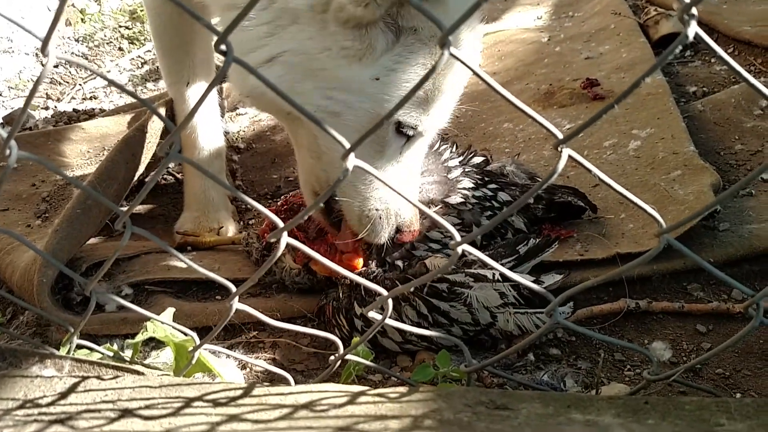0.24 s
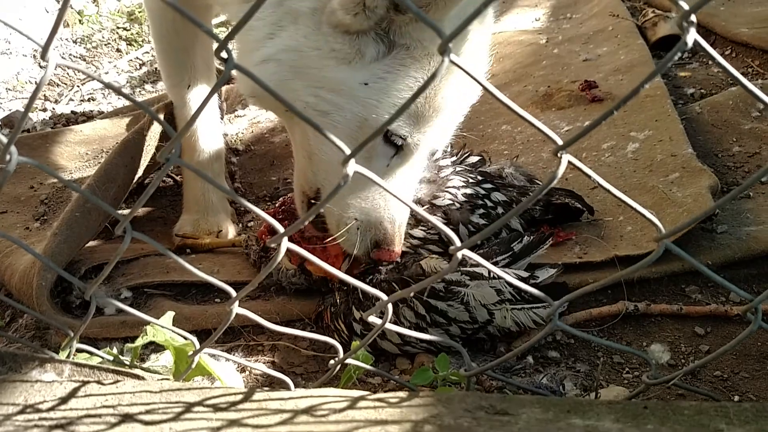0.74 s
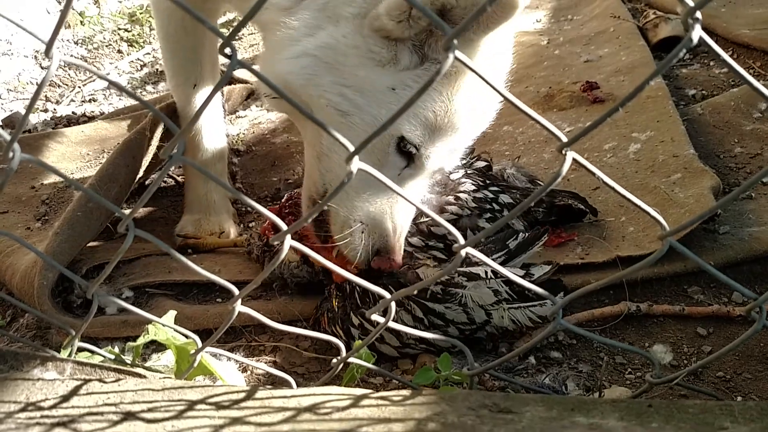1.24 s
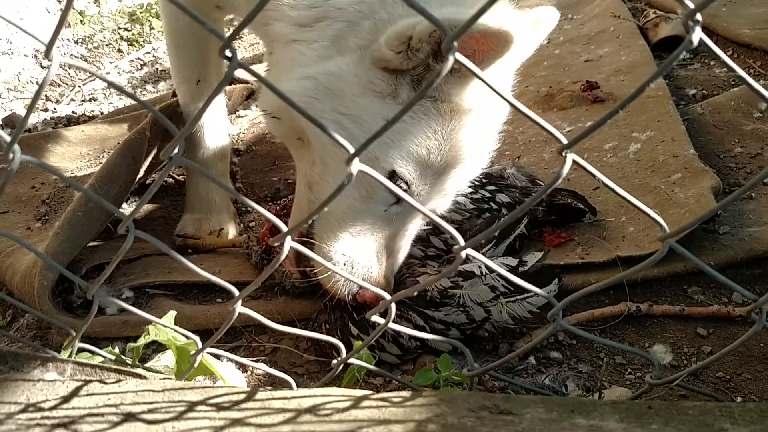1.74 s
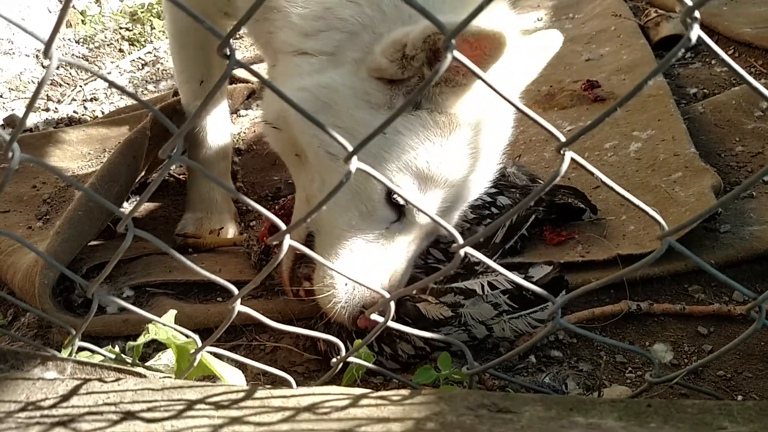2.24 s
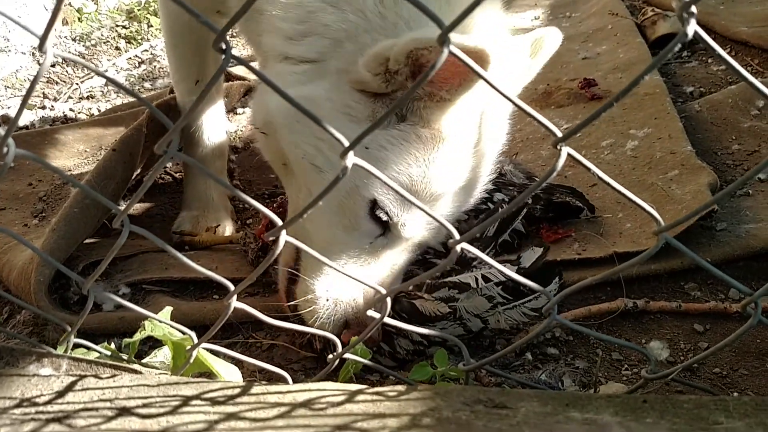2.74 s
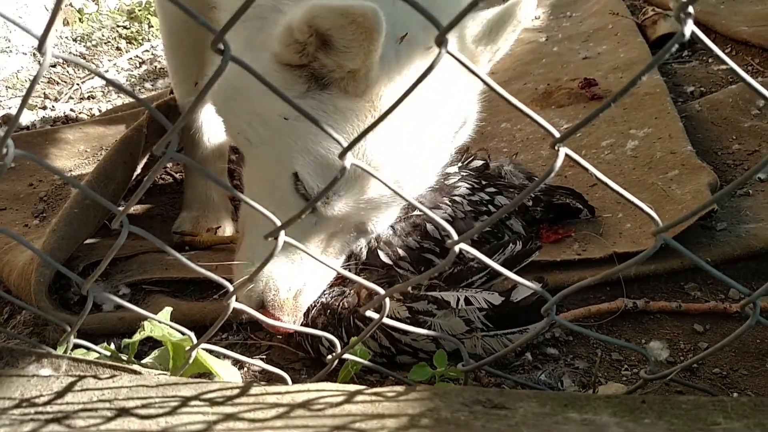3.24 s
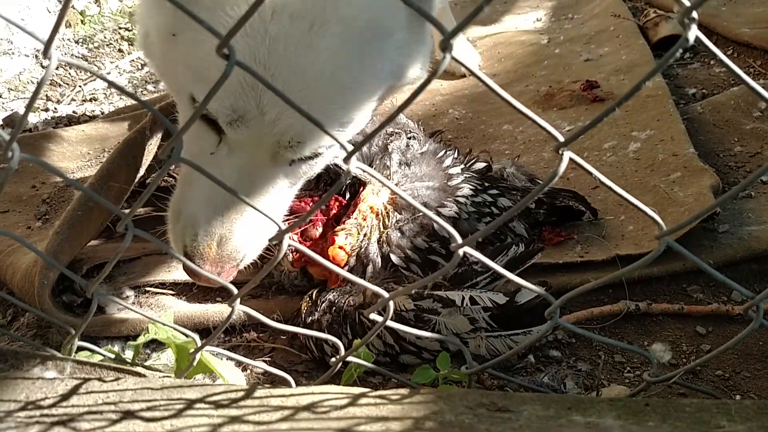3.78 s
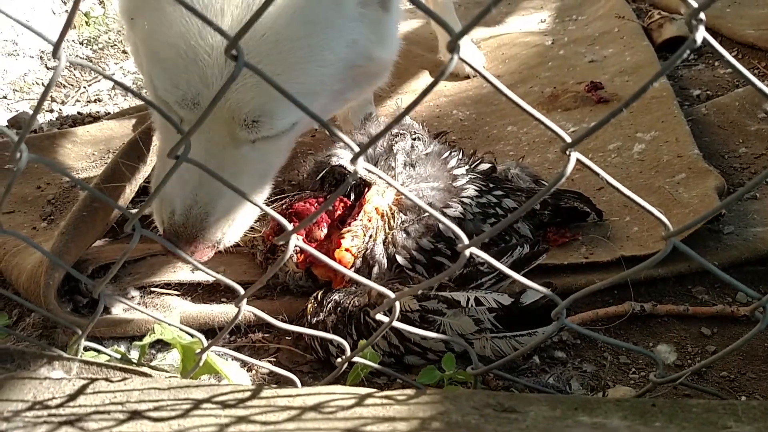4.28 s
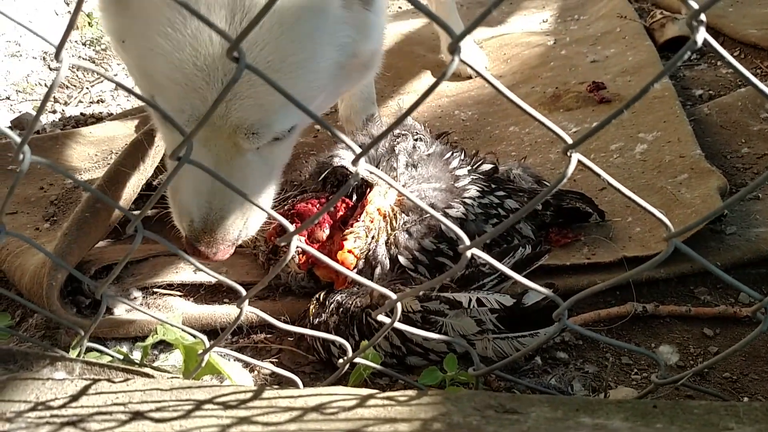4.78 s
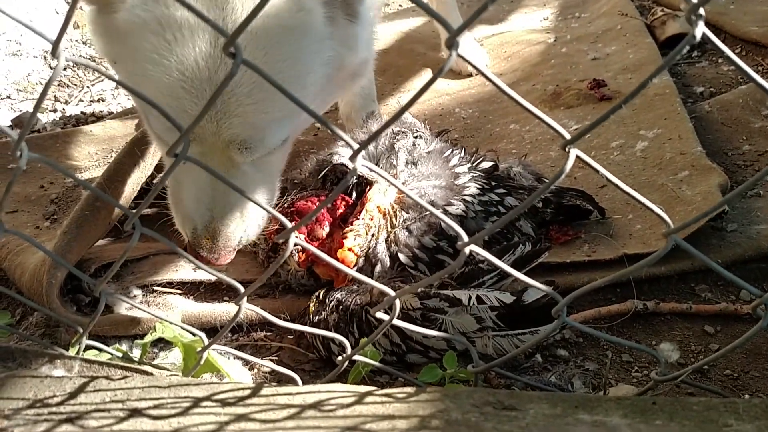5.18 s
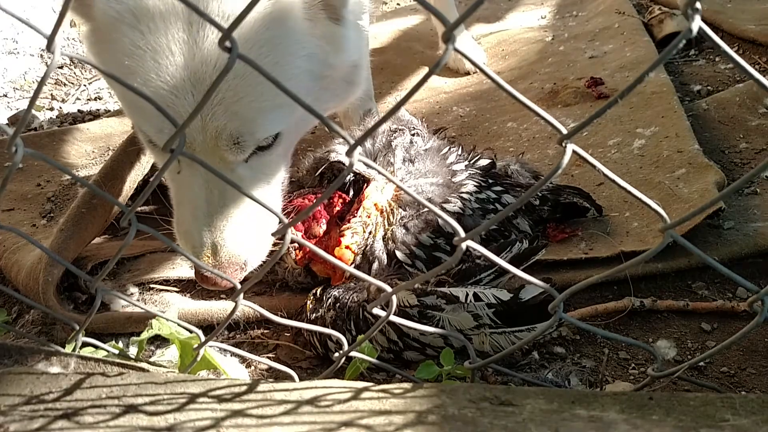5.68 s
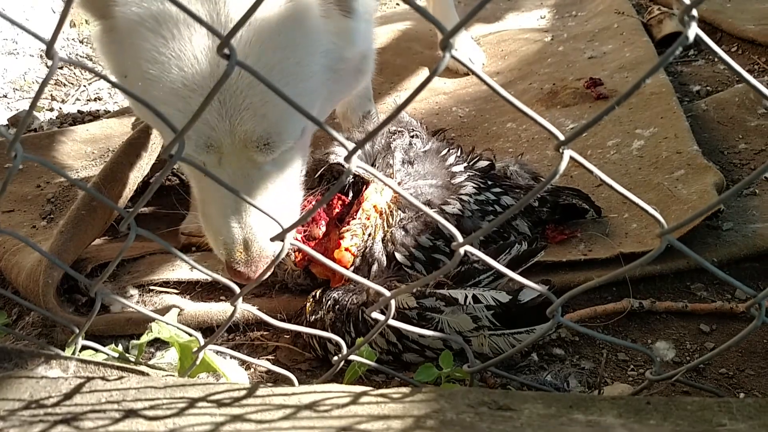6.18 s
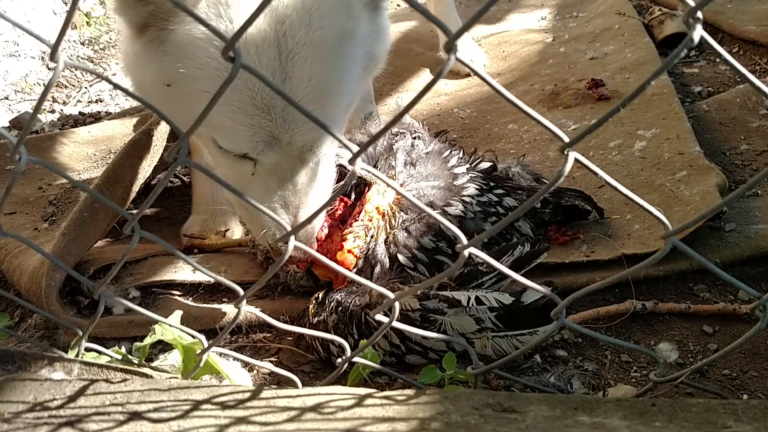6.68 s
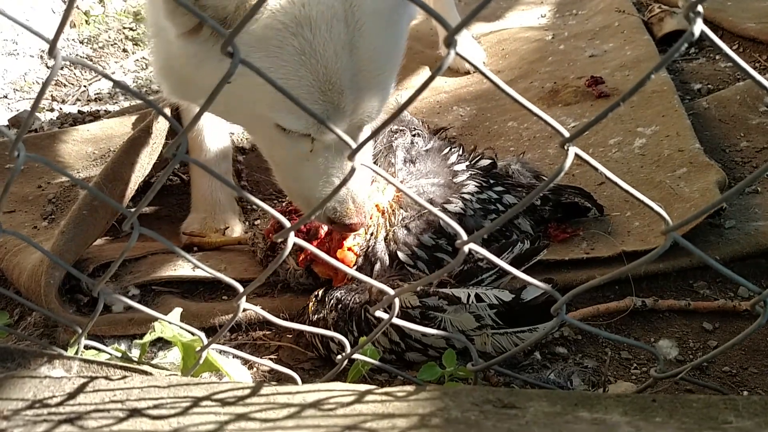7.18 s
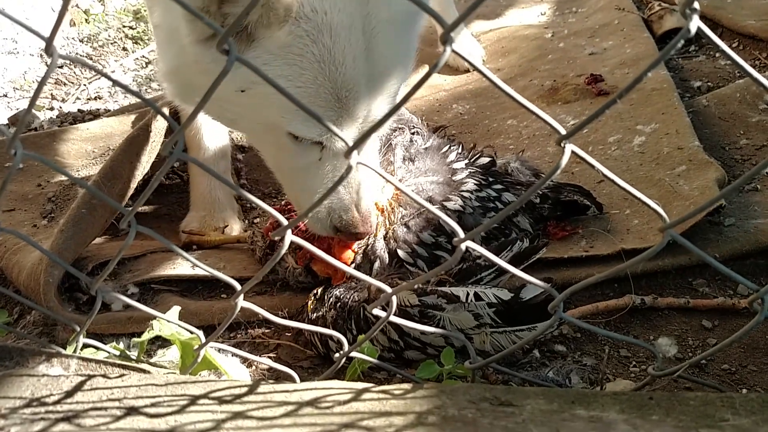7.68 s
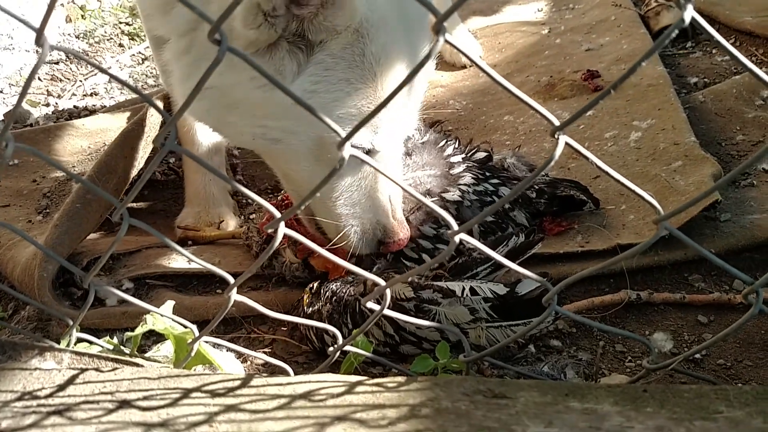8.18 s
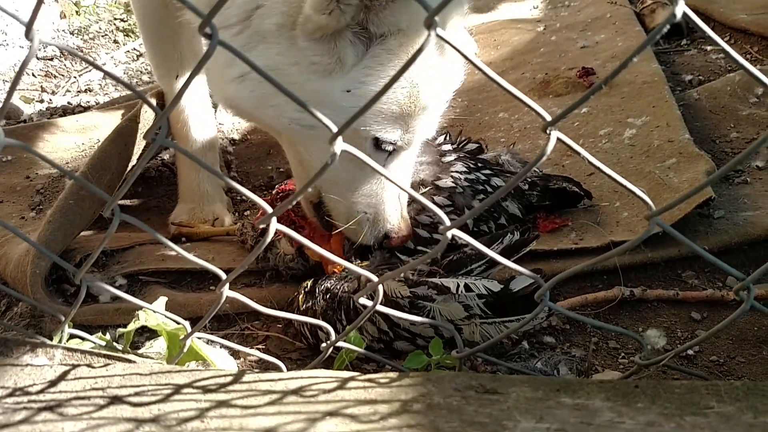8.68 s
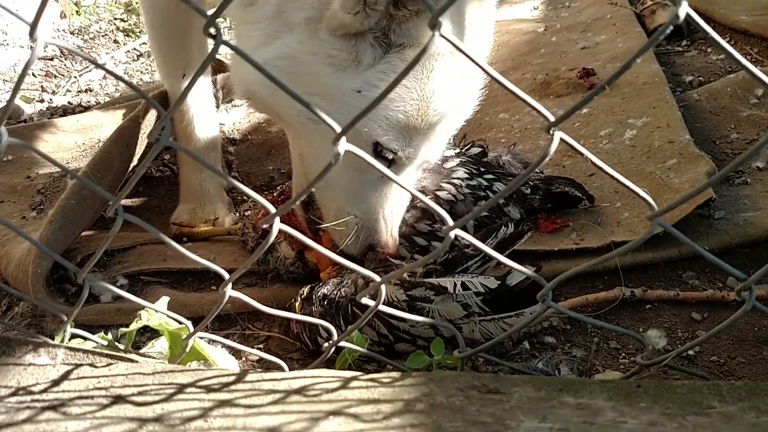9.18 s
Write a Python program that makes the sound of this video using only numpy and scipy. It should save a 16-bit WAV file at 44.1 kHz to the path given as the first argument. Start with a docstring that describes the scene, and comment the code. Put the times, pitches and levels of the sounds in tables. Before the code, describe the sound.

A dog feeds close to the microphone in an open yard. Dry, brittle bone cracks come in irregular bursts, the sharpest around four seconds, with small wet clicks and brief tooth squeaks between. Behind it a cooling unit drones low and steadily, its fan tones slowly beating with a mains hum and airy roar. Soft hiss, a faint rapid treble tick and a few thin bird whistles fill the background.

```python
"""Dog cracking bones beside a cooling unit

A dog cracks bones between its teeth in a yard, close by: ringing modes with dry noise snaps, and tooth squeaks.
An outdoor cooling unit drones behind: beating sine blade tones of two fans, a mains hum and roaring air.
Coloured noise makes hiss and rustle, shaken sines thin whistles, and short sine blips a fast treble tick."""
import sys
import numpy as np
from scipy import signal
from scipy.fft import rfft, irfft
from scipy.io import wavfile
from scipy.ndimage import uniform_filter1d

SR = 44100
rng = np.random.default_rng(int(sys.argv[2]) if len(sys.argv) > 2 else 0)


def transcribe(u):
    """Save the signal u as a 16-bit wav file named by the first command-line argument.

    u: samples, shape (n,) or (channels, n), limited to [-1, 1]; the rate is SR.
    q: integer samples, one column per channel.
    """
    v = np.clip(np.atleast_2d(u).T, -1, 1)
    q = np.round(v * 32767).astype(np.int16)
    wavfile.write(sys.argv[1], SR, q)


def attenuation_scalar(level_db):
    """Turn a level in dB into a linear amplitude multiplier (20 dB per decade)."""
    decades = np.asarray(level_db, float) / 20
    return 10 ** decades


N = 415863
T = np.arange(N) / SR


def walk(rate):
    """Random levels held 1 / rate s and slewed twice; spread near 1."""
    hold = int(SR / rate)
    steps = np.repeat(rng.standard_normal(N // hold + 1), hold)
    return 1.68 * uniform_filter1d(uniform_filter1d(steps, hold), hold)[:N]


def air(spectrum, flicker_db, rate):
    """Noise of a given colour, rms 1; each octave flickers on its own."""
    hz = np.maximum(np.fft.rfftfreq(N, 1 / SR), 1)
    point_hz, point_db = np.transpose(np.array(spectrum, float))
    colour_db = np.interp(np.log(hz), np.log(point_hz), point_db, right=-90)
    coloured = rfft(rng.standard_normal(N)) * attenuation_scalar(colour_db)
    octave = np.log2(hz / 31.25)
    out = np.zeros(N)
    for k in range(10):
        share = np.clip(1 - abs(octave - k), 0, 1)  # neighbouring octaves crossfade
        out += attenuation_scalar(flicker_db * walk(rate)) * irfft(coloured * share, N)
    return out / np.std(out)


def add(out, s, sound):
    """Mix a short sound in at s seconds."""
    i = max(int(s * SR), 0)
    out[i:i + len(sound)] += sound[:N - i]


def fan_blades():
    """Blade tones of two fans at nearly the same speed: they beat, and waver in the turbulent air."""
    first_blades_hz, second_blades_hz = 86.226, 86.368
    # blade orders of the first fan: order, level/dB rms
    first_fan = [(1, -59), (2, -36), (3, -48), (4, -54.5), (5, -45), (6, -54.5), (8, -72), (10, -67),
                 (13, -72), (18, -70.5)]
    # blade orders of the second fan: order, level/dB rms, t/s when in step with the first
    second_fan = [(1, -62, 4.53), (2, -46, 3.55), (3, -54, 2.3), (4, -46, 1.52), (5, -53.5, .89),
                  (6, -70, .06), (8, -75, .72)]
    second = {order: (db, s) for order, db, s in second_fan}
    out = np.zeros(N)
    for order, first_db in first_fan:
        second_db, in_step_s = second.get(order, (-np.inf, 0))
        # both fans share the waver, which grows with the order
        phase = 2 * np.pi * rng.random() + (.08 + .04 * order) * walk(6)
        waver_db = (.7 + .08 * order) * walk(9)
        for hz, db in (first_blades_hz, first_db), (second_blades_hz, second_db):
            out += attenuation_scalar(db + waver_db) * np.sin(2 * np.pi * order * hz * (T - in_step_s) + phase)
    return np.sqrt(2) * out


def mains_hum():
    """A single 120 Hz tone from the mains, slightly unsteady in level."""
    level_db = -39 + .36 * walk(1.75)  # rms
    return np.sqrt(2) * attenuation_scalar(level_db) * np.sin(2 * np.pi * 120 * T)


def housing_roar():
    """Air roars in the housing: low noise with resonant peaks."""
    # relative spectrum: f/Hz, density/dB per Hz
    roar_colour = [(15, -11), (35, -28), (60, -20.5), (100, -9.5), (130, -10.5), (158, 2.5), (200, -14.5),
                   (238, -0.5), (250, -4.5), (270, -2), (330, -6), (378, -9.5), (408, -14), (436, -13),
                   (452, -2.5), (475, -14.5), (540, -17.5), (750, -30.5)]
    return attenuation_scalar(-38) * air(roar_colour, flicker_db=.8, rate=6)


def hiss():
    """Steady broad hiss of the yard, as softly flickering noise."""
    # relative spectrum: f/Hz, density/dB per Hz
    hiss_colour = [(410, -14), (700, -4.5), (907, -1), (1270, -2), (1700, -5.5), (2600, -15), (3400, -8.5),
                   (4300, -18), (8650, -21.5), (10200, -24.5), (11500, -30), (13400, -34.5), (15500, -29.5)]
    return attenuation_scalar(-55) * air(hiss_colour, flicker_db=.17, rate=19)


def rustle():
    """Brighter noise that grows over the hiss and flutters."""
    # relative spectrum: f/Hz, density/dB per Hz
    rustle_colour = [(800, -5), (1400, 0), (2300, -5.5), (2700, -5.5), (3400, -1.5), (4400, -12),
                     (8500, -14), (11000, -23.5), (13000, -39)]
    # swell of the rustle: t/s, level/dB rms
    rustle_swell = [(0, -72), (2, -59.5), (5.5, -54.5), (8, -55.5), (9.43, -57.5)]
    swell_db = np.interp(T, *np.transpose(rustle_swell))
    return attenuation_scalar(swell_db + .59 * walk(8)) * air(rustle_colour, flicker_db=.41, rate=11)


def tick():
    """A 4.5 ms blip of sines thirty times a second, a little uneven in time, size and pitch."""
    start_s, period_s = .0093, .0333
    # partials of the blip: f/Hz, peak level/dB
    tick_partials = [(10350, -61), (8650, -66), (11600, -73)]
    out = np.zeros(N)
    t = np.arange(int(.0045 * SR)) / SR
    for k, (late, size, tone) in enumerate(rng.standard_normal((int(N / SR / period_s), 3))):
        blip = np.zeros(len(t))
        for hz, db in tick_partials:
            blip += attenuation_scalar(db + 1.2 * size) * np.sin(2 * np.pi * hz * (1 + .012 * tone) * t)
        add(out, start_s + k * period_s + .0026 * late, blip * np.hanning(len(t)))
    return out


def crack(centre_hz, focus_db, snap_db, ring_time):
    """One break: it rings the modes near its centre most; a dry snap carries the treble."""
    # what bone and mouth ring with: f/Hz, level/dB, t60/s before the factor ring_time
    bone_modes = [(675, 11.5, 0.01), (880, 12.5, 0.013), (1150, -0.5, 0.029), (1376, 9, 0.011),
                  (2300, 5.5, 0.01), (2840, 1.5, 0.01), (3240, -2, 0.014), (5320, -3.5, 0.0071)]
    t = np.arange(int(.04 * SR)) / SR
    hz, db, t60 = np.transpose(bone_modes)[:, :, None]
    detuned_hz = hz * (1 + .015 * rng.standard_normal(hz.shape))
    reach_db = -focus_db * np.log2(hz / centre_hz) ** 2
    decay_db = -60 * t / (t60 * ring_time)
    rings = attenuation_scalar(db + reach_db + decay_db) * np.sin(2 * np.pi * detuned_hz * t)
    ring = rings.sum(axis=0) * (1 - np.exp(-(t / .00065) ** 2))  # soft onset
    snap_band = signal.butter(4, (3000, 9000), "bandpass", fs=SR, output="sos")
    burst = rng.standard_normal(len(t)) * np.exp(-t / .0017)
    snap = signal.sosfilt(snap_band, burst)
    return ring / abs(ring).max() + attenuation_scalar(snap_db) * snap / abs(snap).max()


def wet_clicks():
    """A sparse scatter of 70 small wet clicks: faint breaks of random size and tone."""
    out = np.zeros(N)
    for place, size, tone in rng.random((70, 3)):
        click = crack(800 * 4 ** tone, focus_db=5.3, snap_db=-12, ring_time=.97)
        add(out, place * N / SR, attenuation_scalar(-53.5 + 9.8 * size) * click)
    return out


def whistle(length, start_hz, end_hz, width_hz):
    """Narrow breathy tone, steady or gliding down: a sine shaken in size and phase by noise."""
    n = int(length * SR)
    rough = uniform_filter1d(rng.standard_normal((2, n)), int(SR / width_hz))
    size, shake = rough / np.std(rough)
    phase = 2 * np.pi * np.cumsum(np.linspace(start_hz, end_hz, n)) / SR
    tone = (1 + .4 * size) * np.sin(phase + .6 * shake)
    return tone * np.linspace(1.2, .75, n) * signal.windows.tukey(n, .3)


def bird_phrases():
    """One bird's high three-note phrase, sung as overlapping breathy whistles."""
    # notes of the phrase: t after its start/s, length/s, start f/Hz, end f/Hz, level/dB
    phrase_notes = [(0, .14, 7180, 7180, -68), (.11, .07, 7800, 7700, -67), (.145, .1, 7050, 6850, -69)]
    # when the phrase is sung: t/s, added level/dB
    phrase_times = [(1.275, 0), (3.395, 0)]
    out = np.zeros(N)
    for s, sung_db in phrase_times:
        for after, length, start_hz, end_hz, db in phrase_notes:
            add(out, s + after, attenuation_scalar(db + sung_db) * whistle(length, start_hz, end_hz, width_hz=550))
    return out


def bone_cracks():
    """The loud cracks of bone between the teeth, each with its own ring and snap."""
    # breaks: t/s, peak level of the ring/dB, centre of the ring f/Hz, focus/dB per octave squared,
    # peak level of the treble snap against the ring/dB
    breaks = [(1.864, -38, 900, 14, -25), (1.8857, -31.5, 1100, -1.5, -11), (1.891, -31.5, 2200, 13, -13),
              (1.8925, -31, 895, 37, -30), (2.264, -33, 990, 40, -27), (2.333, -34, 1300, 5, -25),
              (2.379, -42, 1800, 14, -24), (2.405, -43, 2200, 10, -22), (2.3828, -26, 800, 30, -22),
              (2.4388, -34, 1300, 1, -6), (2.499, -24.5, 820, 32, -30), (3.6505, -32, 880, 22, -22),
              (3.921, -42, 2800, 8, -20), (3.948, -41, 1650, 14, -20), (3.9762, -33, 1700, 19, -10),
              (3.9947, -17, 2500, 8, -23), (4.011, -39, 2200, 8, -18), (4.02, -33, 1900, 6, -13),
              (4.251, -43, 2300, 8, -18), (5.015, -38.5, 2800, 20, -26), (5.618, -39, 900, 14, -25),
              (6.297, -32.5, 1250, 28, -10), (6.322, -36, 2600, 2.5, -16), (6.386, -38, 1900, 4, -22),
              (6.543, -41, 2200, 8, -13), (6.711, -38, 950, 15, -22), (7.091, -32.5, 940, 16, -24)]
    out = np.zeros(N)
    for s, db, centre_hz, focus_db, snap_db in breaks:
        ring_time = .62 + .014 * focus_db  # the narrower a crack, the longer it rings
        add(out, s, attenuation_scalar(db) * crack(centre_hz, focus_db, snap_db, ring_time))
    return out


def low_whistle():
    """A lower whistle in two notes that glide down a little."""
    # notes: t/s, length/s, start f/Hz, end f/Hz, level/dB
    low_notes = [(2.29, .21, 3660, 3590, -57.5), (2.495, .2, 3580, 3480, -56.5)]
    out = np.zeros(N)
    for s, length, start_hz, end_hz, db in low_notes:
        add(out, s, attenuation_scalar(db) * whistle(length, start_hz, end_hz, width_hz=280))
    return out


def squeak(length, hz, first_db):
    """A tooth slips over bone: three harmonic partials, uneven in size and phase."""
    n = int(length * SR)
    noise = rng.standard_normal((2, 2000))
    shake, size = uniform_filter1d(uniform_filter1d(noise, 50), 50)[:, :n] * 8.7
    phase = 2 * np.pi * hz * np.arange(n) / SR + .45 * shake
    tone = attenuation_scalar(first_db) * np.sin(phase) + np.sin(2 * phase) + attenuation_scalar(-14) * np.sin(3 * phase)
    return tone * (1 + .4 * size) * signal.windows.tukey(n, .4) * np.linspace(1.3, .6, n)


def tooth_squeaks():
    """Short squeaks of teeth slipping on bone."""
    # slips: t/s, length/s, level of the second partial/dB, pitch f/Hz, first partial against the second/dB
    slips = [(2.403, .012, -53, 1150, 8), (3.818, .009, -52, 1160, -4), (3.847, .01, -42, 1170, -7),
             (3.87, 0.0075, -54, 1110, 10), (4.671, .028, -45.5, 1180, -2), (6.118, .012, -52, 1140, -13),
             (6.655, 0.022, -51, 956, -10)]
    out = np.zeros(N)
    for s, length, db, hz, first_db in slips:
        add(out, s, attenuation_scalar(db) * squeak(length, hz, first_db))
    return out


def scene():
    """Everything heard by one microphone in the open air."""
    cooling_unit = fan_blades() + mains_hum() + housing_roar()
    yard = hiss() + rustle() + tick() + bird_phrases() + low_whistle()
    chewing = wet_clicks() + bone_cracks() + tooth_squeaks()
    return (cooling_unit + yard + chewing)[None]


def band_limit(x):
    """A steep low-pass at the top of the band."""
    return signal.sosfilt(signal.butter(12, 16780, fs=SR, output="sos"), x)


def record(dry):
    """The camera cuts the top steeply above 15.5 kHz."""
    top_cut = signal.ellip(10, .2, 80, 15500, fs=SR, output="sos")  # ripple and stop band in dB
    mix = signal.sosfilt(top_cut, dry)
    return band_limit(mix)


dry = scene()
out = record(dry)
transcribe(out)
```